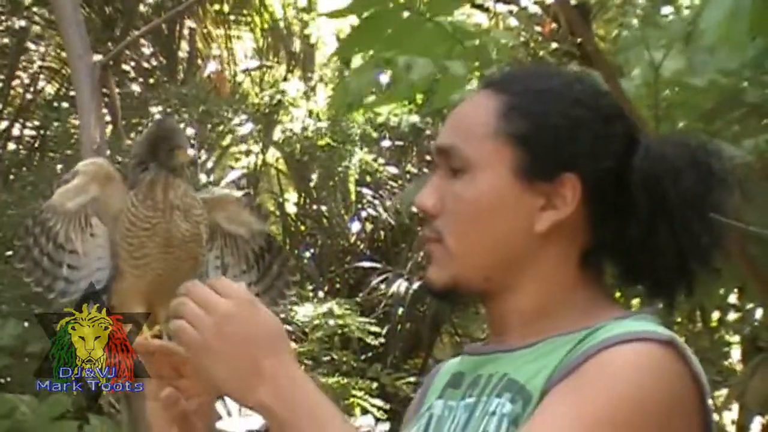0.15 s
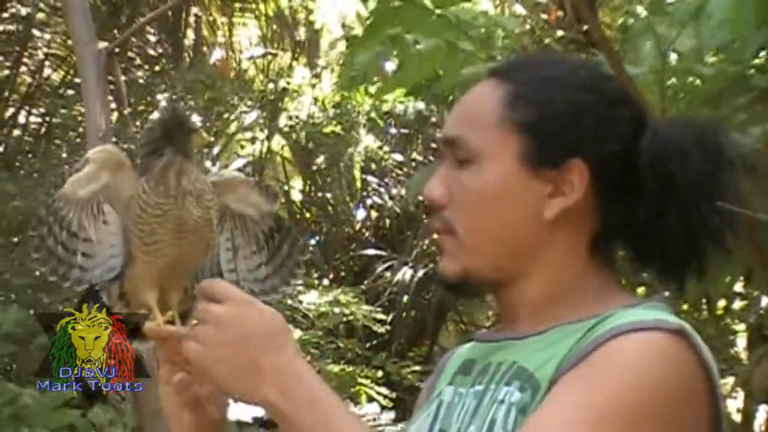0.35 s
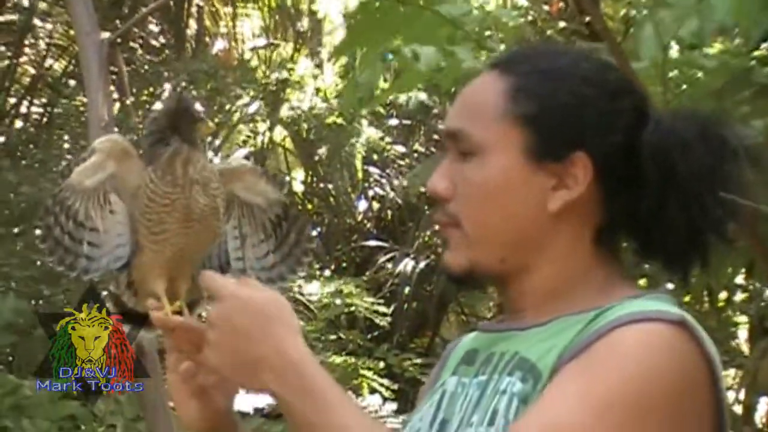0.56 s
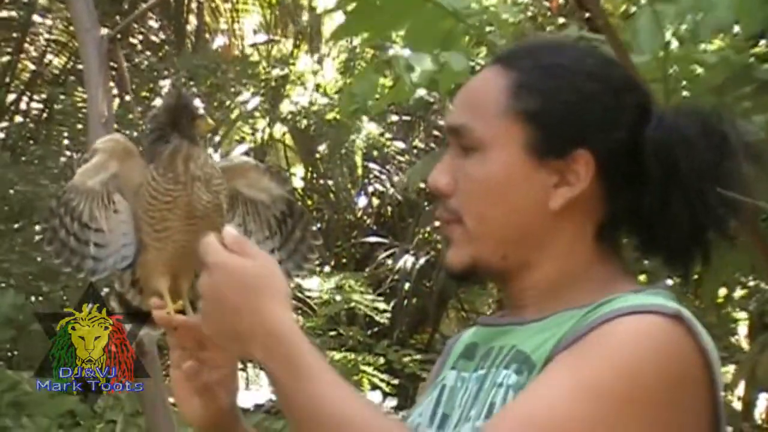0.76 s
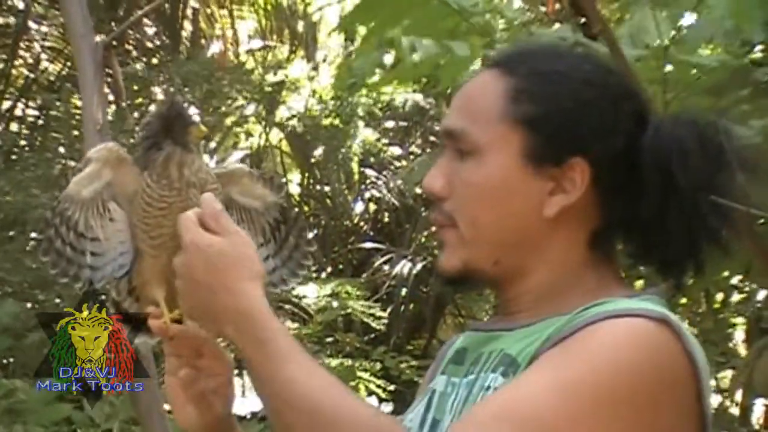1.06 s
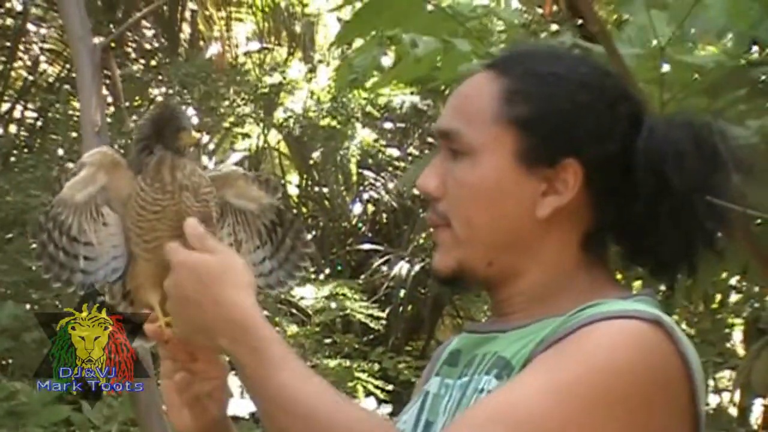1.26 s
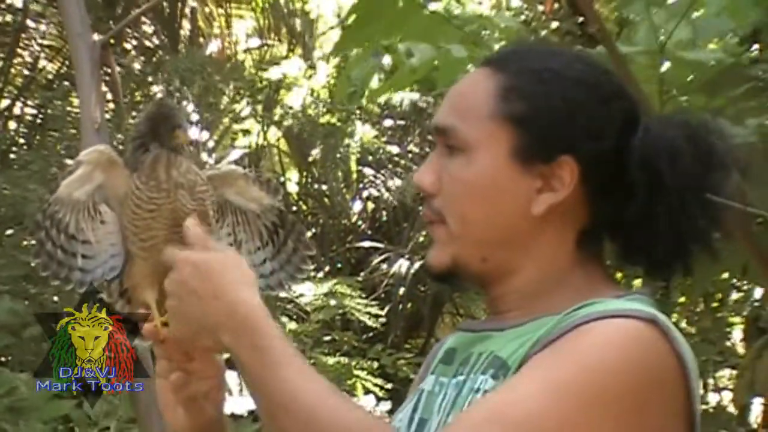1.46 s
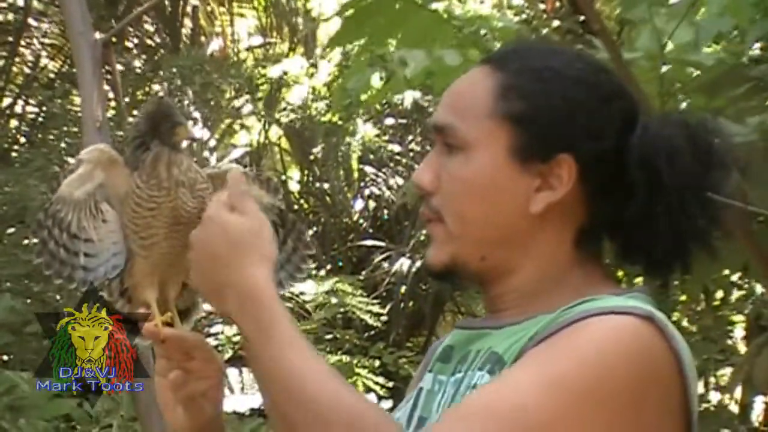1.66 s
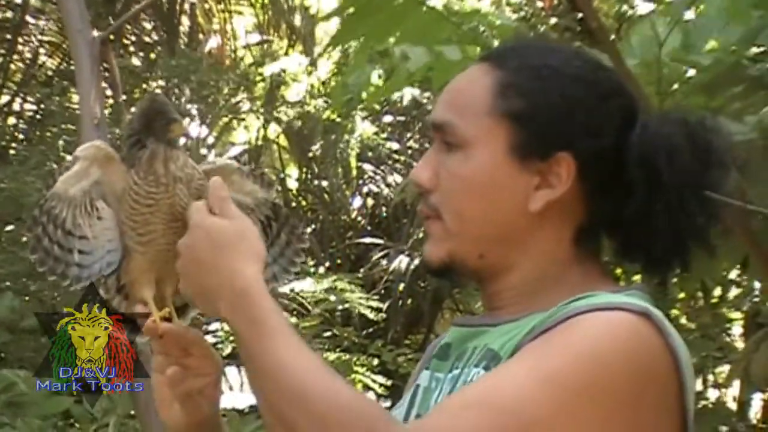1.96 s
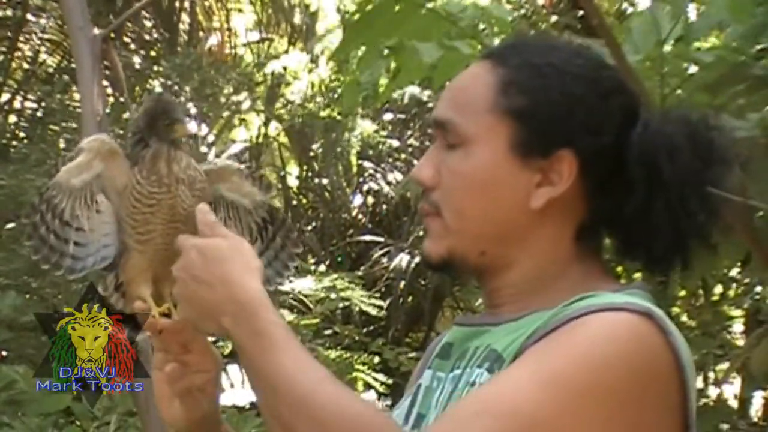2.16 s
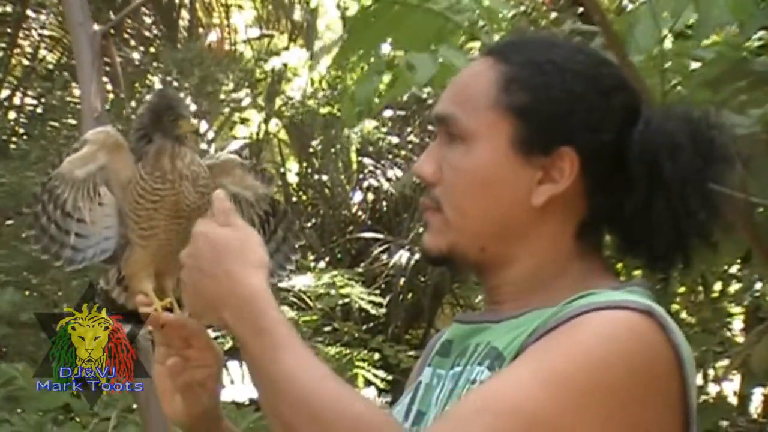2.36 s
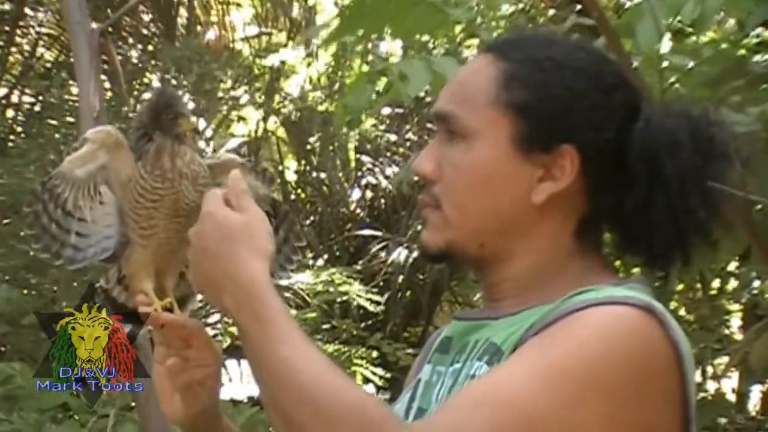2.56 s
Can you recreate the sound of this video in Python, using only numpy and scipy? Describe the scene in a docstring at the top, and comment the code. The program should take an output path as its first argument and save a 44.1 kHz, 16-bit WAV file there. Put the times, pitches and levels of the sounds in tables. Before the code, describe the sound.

A young hawk's single harsh scream, close to the microphone, begins at about 1.85 s with a tiny bill click, rises fast to a piercing peak near 2.0 s, then falls and ends in a brief rattle around 2.5 s, echoing off trees. Before it, steady garden hush carries faint high lisps until 0.6 s and a distant falling whistle from 1.1 to 1.6 s. A faint low bird note lies beneath the scream.

```python
"""The steady hush of a garden, filtered noise, lasts throughout. From the start small birds lisp further off,
then one whistles a fall: gliding sine tones with an echo from the trees. At 1.85 s a young hawk close to
the microphone begins one harsh scream, with a bill click near its onset, a quick rise in pitch, a long fall
and a short rattle: harmonics and hiss shaped by throat resonances. Nearby surfaces and trees echo it,
and another faint bird note sounds beneath it."""
import sys
import numpy as np
from scipy import signal
from scipy.fft import rfft, irfft
from scipy.io import wavfile

SR = 44100
rng = np.random.default_rng(int(sys.argv[2]) if len(sys.argv) > 2 else 0)


def master_out(mix):
    """Clip the mix to full scale and print it as 16-bit PCM to the path in sys.argv[1]."""
    frames = np.transpose(np.atleast_2d(mix))
    ceiling = np.clip(frames, -1, 1)
    pcm = np.round(ceiling * 32767).astype(np.int16)
    wavfile.write(sys.argv[1], SR, pcm)


N = 119070  # samples, 2.7 s


def undb(db):
    """Decibel law: amplitude ratio of a level."""
    return 10 ** (np.asarray(db) / 20)


def times():
    """Uniform sampling: the instant of each sample, s."""
    return np.arange(N) / SR


def at(points, hz):
    """Logarithmic frequency scale: interpolate a table along it."""
    f, v = np.array(points).T
    return np.interp(np.log(np.maximum(hz, 1)), np.log(f), v)


def unit(x):
    """Root-mean-square normalisation to 1."""
    return x / np.sqrt(np.mean(x ** 2))


def bins():
    """Fourier analysis: the frequency of each bin, Hz."""
    return np.fft.rfftfreq(N, 1 / SR)


def colour(x, points):
    """Linear filtering: multiply the spectrum by a table of f/Hz, gain/dB."""
    return irfft(rfft(x) * undb(at(points, bins())), N)


def wander(hz):
    """Band-limited random modulation: Gaussian low-passed noise of unit spread."""
    lowpass = np.exp(-.5 * (bins() / hz) ** 2)
    return unit(irfft(rfft(rng.standard_normal(N)) * lowpass, N))


def pan(db):
    """Interaural level difference: gains that set left minus right to db."""
    return undb(np.array([[db], [-db]]) / 2)


def turn(hz):
    """Phase is the time integral of angular frequency, rad."""
    return 2 * np.pi * np.cumsum(hz) / SR


# Spectrum of the garden hush: f/Hz, relative level/dB
HUSH_SPECTRUM = [(15, -68), (25, -29), (104, -17.5), (183, -10), (291, -13.5), (429, -5), (463, -6),
                 (500, -2.5), (541, -4.5), (883, 0), (1060, -3), (1560, -5), (1920, -10), (3210, -6.5),
                 (3950, -14), (5250, -9.5), (6290, -13), (7540, -9), (12000, -29), (15600, -68),
                 (22000, -120)]
# Level difference between channels: f/Hz, left minus right/dB
HUSH_BALANCE = [(50, 9), (150, 8.5), (350, 9.5), (700, 7.5), (1500, 4), (3000, 4.5), (7000, 2.5),
                (12000, 1)]
# Coherence of the sound field: f/Hz, correlation of left and right (-1 to 1)
HUSH_CORRELATION = [(40, -0.19), (90, 0.54), (180, 0.31), (400, 0.74), (1000, 0.82), (2500, 0.78),
                    (5000, 0.96), (8000, 0.54), (12000, -0.24)]
HUSH_DB, HUSH_SWELL_DB, HUSH_SWELL_HZ = -41.5, 0.71, 2.4
HUSH_TOP_HZ = 12500


def garden():
    """Diffuse field: partly correlated coloured noise, stronger on the left and swelling slightly."""
    f = bins()
    correlation = np.clip(at(HUSH_CORRELATION, f), -.98, .98)
    lean = at(HUSH_BALANCE, f)
    # the split of power between sum and difference sets the correlation
    noise = rfft(rng.standard_normal((2, N))) * undb(at(HUSH_SPECTRUM, f))
    mid, side = noise * np.sqrt([1 + correlation, 1 - correlation])
    air = irfft(np.array([mid + side, mid - side]) * undb(np.array([lean, -lean]) / 2), N)
    air = signal.sosfilt(signal.ellip(8, .2, 70, HUSH_TOP_HZ, fs=SR, output="sos"), air)
    level = undb(HUSH_DB + HUSH_SWELL_DB * wander(HUSH_SWELL_HZ))
    return air / np.std(air.mean(axis=0)) * level


TREES_CROSSOVER_HZ, TREES_BUILD_S = 5000, 0.018
TREES_T60_S, TREES_TREBLE_T60_S = 0.47, 1
TREES_SPREAD, TREES_TREBLE_SPREAD = .3, 0.65  # share of side noise


def trees(x):
    """Reverberation by scattering: convolve with decaying noise, whose treble is wider and lasts longer."""
    t = times()
    mid, side = rng.standard_normal((2, N))
    side = side * np.array([[1], [-1]])
    lowpass = signal.butter(2, TREES_CROSSOVER_HZ, fs=SR, output="sos")
    highpass = signal.butter(2, TREES_CROSSOVER_HZ, "high", fs=SR, output="sos")
    low = signal.sosfilt(lowpass, mid + TREES_SPREAD * side)
    high = signal.sosfilt(highpass, mid + TREES_TREBLE_SPREAD * side)
    # a fall to 1/1000 of the amplitude is 60 dB
    low = low * np.exp(-np.log(1000) * t / TREES_T60_S)
    high = high * np.exp(-np.log(1000) * t / TREES_TREBLE_T60_S)
    tail = (low - high) * (1 - np.exp(-(t / TREES_BUILD_S) ** 2))
    tail = tail / np.sqrt(np.sum(tail ** 2) / 2)  # unit energy per channel on average
    return signal.fftconvolve(x[None], tail, axes=1)[:, :N]


# A distant bird's falling whistle: t/s, f/Hz, level/dB
WHISTLE_TRACK = [(1.129, 3150, -55), (1.171, 3500, -44.5), (1.207, 3766, -37.5), (1.24, 3906, -64),
                 (1.29, 3740, -41), (1.35, 3470, -50.5), (1.4, 3180, -42), (1.445, 2994, -45),
                 (1.5, 2970, -38.5), (1.571, 2816, -49), (1.618, 2674, -45)]
# Short notes of other birds: t/s, length/s, start f/Hz, end f/Hz, level/dB, pitch scatter (share of f)
BIRD_NOTES = [(-.04, 0.091, 6400, 6770, -36.5, 0.13), (0.041, 0.11, 7890, 7620, -37.5, .025),
              (0.148, 0.077, 9300, 9150, -50, .015), (.26, 0.055, 9270, 8300, -46.5, 0.047),
              (0.292, .085, 8800, 6250, -37, 0.077), (.33, 0.25, 7770, 7730, -48, .045),
              (0.322, 0.049, 502.4, 497, -40, 0.0056), (2.112, 0.186, 1040, 1000, -44.5, 0.0044)]
BIRDS_WET_DB, BIRDS_PAN_DB = -1, 2


def other_birds():
    """Frequency modulation of pure tones: one long whistle, faint lisps and notes, with their echo."""
    t = times()
    s, hz, db = np.array(WHISTLE_TRACK).T
    pitch = np.interp(t, s, hz) * (1 + 0.0027 * wander(104))
    song = undb(np.interp(t, s, db, left=-120, right=-120)) * np.sin(turn(pitch))
    for start, length, hz0, hz1, db, scatter in BIRD_NOTES:
        progress = np.clip((t - start) / length, 0, 1)
        pitch = (hz0 + (hz1 - hz0) * progress) * (1 + scatter * wander(500))
        song = song + undb(db) * np.sin(np.pi * progress) * np.sin(turn(pitch))
    return pan(BIRDS_PAN_DB) * (song + undb(BIRDS_WET_DB) * trees(song))


# Fundamental of the scream: t/s, f/Hz
SCREAM_PITCH = [(1.86, 880), (1.885, 1030), (1.91, 1260), (1.935, 1605), (1.975, 1710), (2.012, 1785),
                (2.05, 1725), (2.09, 1610), (2.122, 1460), (2.16, 1395), (2.22, 1335), (2.3, 1258),
                (2.35, 1220), (2.42, 1190), (2.47, 1170), (2.49, 1130), (2.53, 1020)]
# Effort of the scream: t/s, level/dB, roughness (0 to 1)
SCREAM_EFFORT = [(1.849, -38.5, 0.46), (1.885, -32.5, 0.61), (1.914, -26, 0.4), (1.935, -25.5, 0.48),
                 (1.965, -20, 0.27), (2.005, -17, 0.28), (2.018, -14, 0.2), (2.024, -27, 0.2),
                 (2.049, -14.5, 0.06), (2.063, -21.5, 0.22), (2.115, -22.5, 0.21), (2.19, -23, 0.37),
                 (2.281, -25, 0.14), (2.308, -17.5, 0.07), (2.347, -31.5, .1), (2.397, -20, 0.1),
                 (2.44, -32.5, 0), (2.461, -23, .06), (2.468, -43, 0), (2.479, -19.5, 0),
                 (2.494, -37, 0.65), (2.522, -32.5, 0.28), (2.545, -66, 1)]
# Resonances of throat and open bill: f/Hz, gain/dB
THROAT_RESPONSE = [(250, -55), (800, -46), (1250, -20), (1750, -28), (2350, -20.5), (2700, -18.5),
                   (3000, -2), (3350, -2), (3600, -3), (3850, -17), (4200, -19.5), (4750, -14.5),
                   (5200, -17), (5800, -25), (6500, -26), (7200, -10), (8100, -17.5), (8800, -20.5),
                   (9600, -28), (10700, -29.5), (12300, -32.5), (14000, -57)]
# Source spectrum at the syrinx, one entry per harmonic from the first: level/dB
SYRINX_HARMONICS = [1.5, 2.5, 1, -6.5, -1.5, -2, -6, -5, -5, -10]
# spreads at full roughness: pitch jitter (share of f) and its rate, level shimmer and its rate
JITTER, JITTER_HZ, SHIMMER_DB, SHIMMER_HZ = 0.031, 450, 5.5, 160
RASP_DB, RASP_WIDTH_HZ, RASP_PER_OCTAVE_DB = -7.5, 73, 5  # higher harmonics are rougher
HISS_DB = -9
RATTLE_S, RATTLE_ONSET_S, RATTLE_HZ, RATTLE_DEPTH = 2.488, 0.0045, 225, 0.89
# the treble fades as the call runs out: dB per second for each octave above the corner
DULL_FROM_S, DULL_DB_PER_S, DULL_ABOVE_HZ = 2.193, 38.5, 3830


def scream():
    """Source-filter theory: rough syrinx harmonics sweep through throat resonances and end in a rattle."""
    t = times()
    s, db, rough = np.array(SCREAM_EFFORT).T
    rough = np.clip(np.interp(t, s, rough), 0, 1)
    hz = np.interp(t, *np.array(SCREAM_PITCH).T)
    phase = turn(hz * (1 + JITTER * rough * wander(JITTER_HZ)))
    dull = DULL_DB_PER_S * np.maximum(t - DULL_FROM_S, 0)
    voice = 0
    for k, strength_db in enumerate(SYRINX_HARMONICS, 1):
        # complex noise shakes both amplitude and phase
        shake = wander(RASP_WIDTH_HZ) + 1j * wander(RASP_WIDTH_HZ)
        rasp = undb(RASP_DB + RASP_PER_OCTAVE_DB * np.log2(k)) * rough * shake
        octaves_above = np.log2(np.maximum(k * hz / DULL_ABOVE_HZ, 1))
        gain_db = at(THROAT_RESPONSE, k * hz) - dull * octaves_above
        harmonic = np.real((1 + rasp) * np.exp(1j * k * phase))
        voice = voice + undb(strength_db + gain_db) * harmonic
    hiss = unit(colour(rng.standard_normal(N), THROAT_RESPONSE))
    voice = voice + undb(HISS_DB) * rough * hiss
    rattle_depth = np.clip((t - RATTLE_S) / RATTLE_ONSET_S, 0, 1) * RATTLE_DEPTH
    rattle = 1 + rattle_depth * np.cos(turn(RATTLE_HZ * (1 + .15 * wander(85))))
    effort_db = np.interp(t, s, db, left=-120, right=-120)
    effort = undb(effort_db + SHIMMER_DB * rough * wander(SHIMMER_HZ))
    return np.sqrt(2) * voice * effort * rattle


# Spectrum of the bill click: f/Hz, gain/dB
CLICK_SPECTRUM = [(150, -40), (450, -10), (900, 23), (1500, 13), (2300, 17), (3400, 21), (5000, 5),
                  (8000, 6), (14000, -5)]
CLICK_S, CLICK_DECAY_S = 1.8752, .0012
CLICK_DB = -27  # before the spectrum's gain


def bill_click():
    """Impulsive excitation: a decaying noise burst, the dry tick as the bill opens."""
    age = times() - CLICK_S
    tick = rng.standard_normal(N) * (age > 0) * np.exp(-np.abs(age) / CLICK_DECAY_S)
    return undb(CLICK_DB) * colour(tick, CLICK_SPECTRUM)


# Reflections from close by: delay t/s, level re direct/dB, pan added to the hawk's own/dB
NEAR_REFLECTIONS = [(.0043, -41, -2), (.0093, -10, -2), (0.032, -9.5, -1)]
# Phase difference of the direct call: f/Hz, lead of left over right/rad
CHANNEL_PHASE = [(1000, -0.76), (3500, -0.27), (6000, -0.37), (7300, 0.38), (9000, -1.45), (12000, -0.74)]
HAWK_PAN_DB, TREES_DB = 3, -9


def hawk():
    """Superposition of paths: direct with a phase difference between channels, near surfaces, trees."""
    t = times()
    call = scream() + bill_click()
    near = sum(undb(db) * pan(side) * np.interp(t - lag, t, call) for lag, db, side in NEAR_REFLECTIONS)
    half_turn_each_way = .5j * np.array([[1], [-1]]) * at(CHANNEL_PHASE, bins())  # half the lead per channel
    direct = irfft(rfft(call) * np.exp(half_turn_each_way), N)
    return pan(HAWK_PAN_DB) * (direct + near + undb(TREES_DB) * trees(call))


def scene():
    """Linear superposition of all sources."""
    return garden() + other_birds() + hawk()


TOP_HZ = 14200


def record(dry):
    """Band limitation: the recorder's steep low-pass cuts the top."""
    return signal.sosfilt(signal.ellip(8, .2, 70, TOP_HZ, fs=SR, output="sos"), dry)


dry = scene()
out = record(dry)
master_out(out)
```